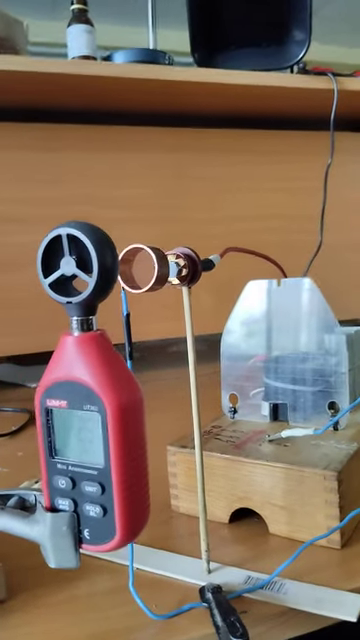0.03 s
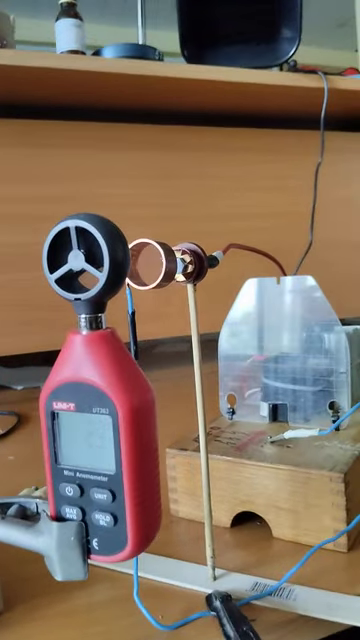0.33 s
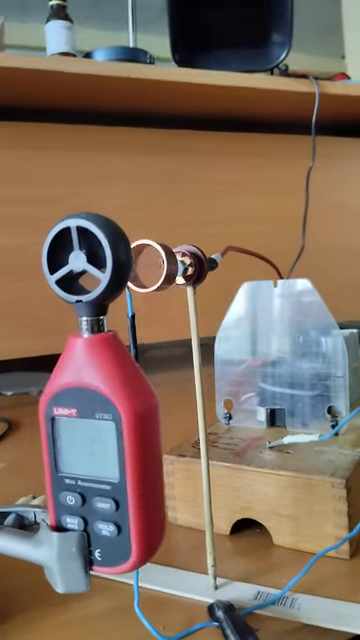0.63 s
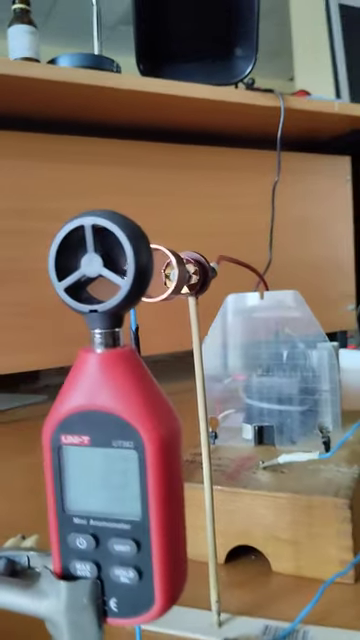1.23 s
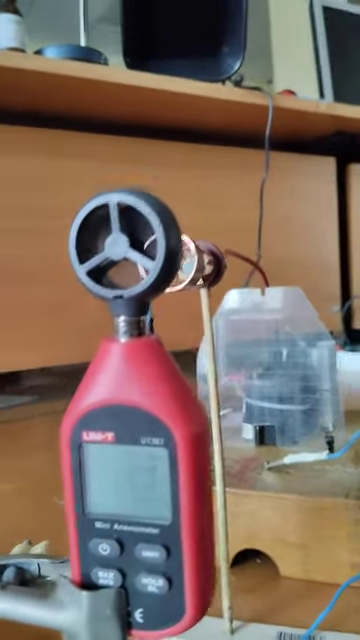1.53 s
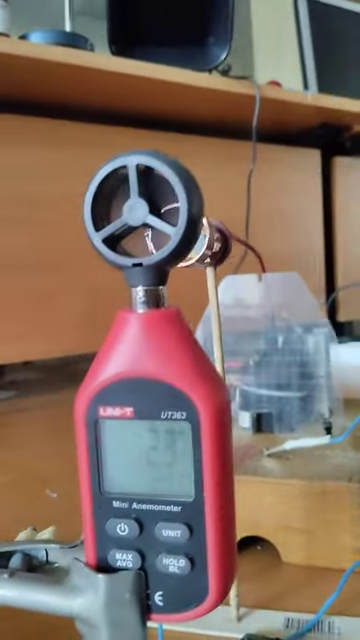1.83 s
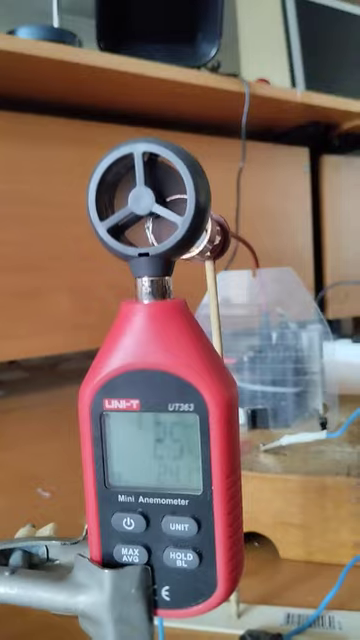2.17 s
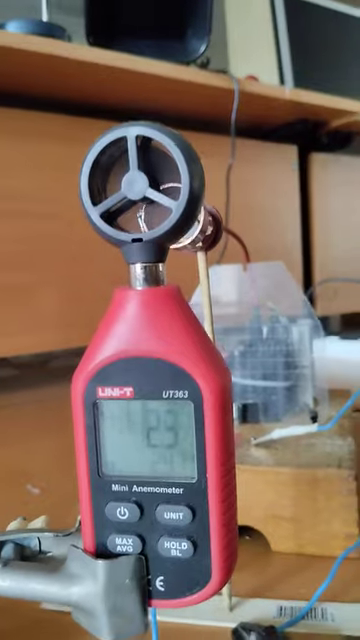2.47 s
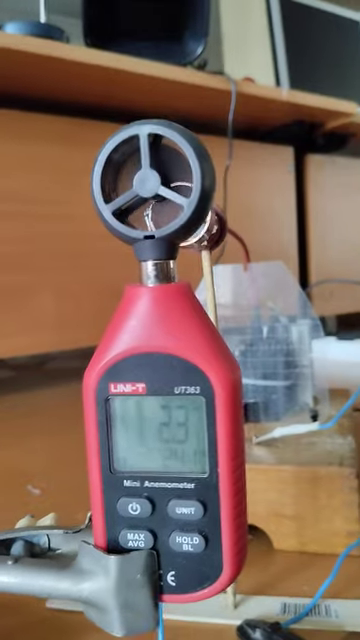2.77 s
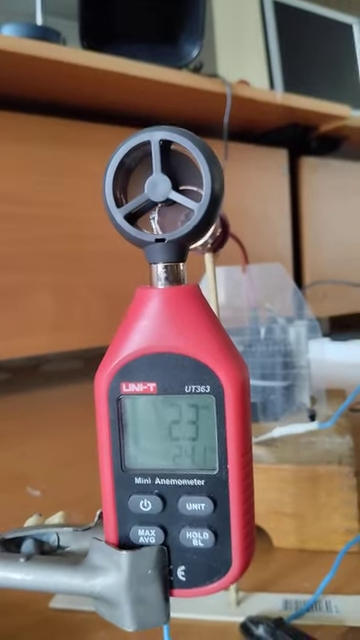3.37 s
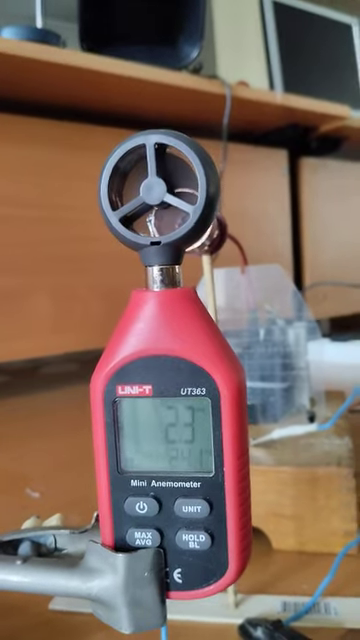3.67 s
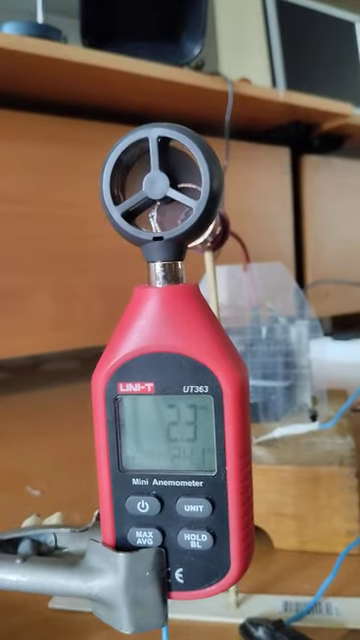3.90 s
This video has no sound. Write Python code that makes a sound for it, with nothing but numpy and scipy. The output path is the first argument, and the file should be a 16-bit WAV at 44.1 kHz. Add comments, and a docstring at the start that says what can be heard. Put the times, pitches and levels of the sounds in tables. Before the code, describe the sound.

A high-voltage discharge hisses steadily from a small device on a desk. The bright hiss shifts slightly in tone as the microphone moves closer. Two faint spark snaps come midway and near the end, over low room rumble.

```python
"""A high-voltage corona hisses steadily between the copper electrodes of a small ion blower on a desk.
Countless tiny discharges merge into noise that rings the electrodes; the microphone moves closer, so the
colour and the desk reflections shift. Two faint snaps, likely stray sparks, over low room rumble and hum."""
import sys
import numpy as np
from scipy import signal
from scipy.fft import rfft, irfft
from scipy.io import wavfile
from scipy.ndimage import uniform_filter1d, map_coordinates

SR = 44100
rng = np.random.default_rng(int(sys.argv[2]) if len(sys.argv) > 2 else 0)


def dump_mix(stems):
    """Bounce the given channels to the path in sys.argv[1] as a 16-bit WAV at rate SR."""
    frames = np.atleast_2d(stems).T  # one column per channel
    limited = np.clip(frames, -1, 1)  # hard clip at full scale
    pcm = np.round(limited * 32767).astype(np.int16)
    wavfile.write(sys.argv[1], SR, pcm)


N = 176400
BINS_HZ = np.arange(N // 2 + 1) * SR / N


# discharge spectrum: f/Hz, relative level/dB
DISCHARGE_SPECTRUM = [(300.0, -44), (1200.0, -32.5), (1750.0, -29.0), (2250.0, -23.0), (2500.0, -31.5),
                      (4300.0, -22), (7000.0, -22), (9700.0, -10.5), (12300.0, -15.0), (12800.0, -13),
                      (13500.0, -17.0), (15800.0, -16.0)]
# resonances of electrodes and surrounding space: f/Hz, width/Hz, level/dB far, midway, close
RESONANCES = [(3011, 244, -6.5, -4.5, -5), (3627, 384, -16.5, -13.5, -11.5),
              (4890, 410, -11.5, -15.0, -12.5), (5607, 210, -12.5, -9.5, -13.5),
              (6290, 370.0, -7.0, -4, -6.5), (6740.0, 310, -4.5, -8, -11.0), (7523, 310, -3.5, -2.5, -1.0),
              (7806, 170.0, -8.5, -4.5, -2.0), (8290, 350, -8, -0.5, -3), (8517, 149, 1, 1.5, -2),
              (8900, 84, -1.5, -4.5, -1), (9186, 390, -4, -1, -1.5), (10010, 320.0, -8, -13, -9.5),
              (11100, 460, -14.5, -35, -10.5)]
# microphone approach: t/s, nearness (0 far, 1 close)
MIC_NEARNESS = [(0.0, 0.0084), (0.6, 0.1), (1.1, 0.36), (1.45, 0.55), (2.0, 0.6), (2.5, 0.82), (3.0, 1),
                (3.9, 1.0)]
# hiss envelope: t/s, level/dB
HISS_LEVEL = [(0, -26), (.7, -26), (1.2, -24.5), (1.8, -23.9), (2.4, -24.5), (3.1, -24.5), (3.9, -25)]

def corona(room_t60_s=.15, room_db=-13, waver_db=.34):
    """Merged discharges ring the electrodes; colour and reflections follow the microphone."""
    nearness = curve(MIC_NEARNESS)
    discharges = path_notches() * rfft(rng.standard_normal(N))
    discharges *= 1 + undb(room_db) * rfft(tail(room_t60_s))
    modes = np.array(RESONANCES)
    centre_hz, width_hz = modes[:, :1], modes[:, 1:2]
    peaks = 1 / (1 + ((BINS_HZ - centre_hz) / width_hz) ** 2) ** 3
    direct = 0
    for position, peak_db in zip((0, .5, 1), modes[:, 2:].T):
        crossfade = np.maximum(0, 1 - 2 * abs(nearness - position))
        power = colour(DISCHARGE_SPECTRUM) ** 2 + undb(peak_db) ** 2 @ peaks
        direct += crossfade * unit(irfft(discharges * np.sqrt(power), N))
    hiss = unit(add_reflections(direct, nearness))
    return hiss * undb(curve(HISS_LEVEL) + waver_db * drift(rate_hz=16))


# cancellation dips: f/Hz, width/Hz, level/dB
NOTCHES = [(4220, 85, -3.5), (5280, 110, -1.5), (7090, 110, -2.5), (7970, 80, -1.5)]

def path_notches():
    """Gain per bin, with narrow dips where sound paths cancel."""
    return undb(sum(db * np.exp(-((BINS_HZ - hz) / width_hz) ** 2) for hz, width_hz, db in NOTCHES))


# bounce off the moving wind meter: t/s, lag/ms, level/dB
METER_REFLECTION = [(0.0, 0.67, -18), (0.4, 0.68, -16), (0.8, 0.654, -29), (1.1, 0.633, -17.5),
                    (1.5, 0.63, -11.5), (1.8, 0.59, -22), (2.1, 0.56, -21.5), (2.6, 0.54, -26),
                    (3.0, 0.52, -21.5), (3.9, 0.61, -24.5)]
# desk, shelf and meter: lag/ms far, lag/ms close, level/dB
SURFACE_REFLECTIONS = [(1.62, 1.541, -21.5), (2.45, 2.4, -17), (3.2, 3.4, -19), (3.7, 4.15, -19.5),
                       (5.6, 6.0, -16.5), (8.3, 8.8, -19.5)]

def add_reflections(direct, nearness, hand_sway_ms=.0081):
    """Nearby surfaces comb-filter the hiss; lags move with the meter, the approach and hand sway."""
    times, meter_ms, meter_db = np.array(METER_REFLECTION).T
    meter_bounce = moving_delay(direct, curve(np.c_[times, meter_ms]))
    heard = direct - undb(curve(np.c_[times, meter_db])) * meter_bounce
    for far_ms, close_ms, db in SURFACE_REFLECTIONS:
        lag_ms = far_ms + (close_ms - far_ms) * nearness + hand_sway_ms * drift(rate_hz=2.2)
        heard += undb(db) * moving_delay(direct, lag_ms)
    return heard


# snaps: t/s, crack level/dB, crack treble/dB, knock level/dB, echo lag/ms, echo level/dB
SNAPS = [(1.9769, -3.5, 2, -22, 1.4, -2), (3.7115, -5, -7, -13, 3.0, -5)]
# bright crack: f/Hz, relative level/dB
CRACK_SPECTRUM = [(300, -31), (1500, -22), (4500, -14), (6300, 1), (8000, -1), (10500, 2), (12500, -9),
                  (16000, -11)]
# dull knock: f/Hz, relative level/dB
KNOCK_SPECTRUM = [(100, -14), (230, -2), (390, -10.5), (650, -5.5), (1150, -0.5), (1550, 0), (1800, -8),
                  (2400, 2), (4000, -6), (9000, -21.5)]

def sparks(restrike_ms=.235, restrike_db=-5, knock_t60_s=.035, knock_tail_db=-4):
    """Each spark cracks and restrikes at once, with one close echo and a short, dull knock."""
    snaps = np.zeros(N)
    for start_s, crack_db, treble_db, knock_db, echo_ms, echo_db in SNAPS:
        treble_shelf = colour([(8500, 0), (11000, treble_db)])
        crack = delay(click(CRACK_SPECTRUM), start_s)
        crack = irfft(rfft(crack) * treble_shelf, N)
        crack += undb(restrike_db) * delay(crack, restrike_ms / 1000)
        crack += undb(echo_db) * delay(crack, echo_ms / 1000)
        knock = delay(click(KNOCK_SPECTRUM), start_s)
        knock += undb(knock_tail_db) * signal.fftconvolve(knock, tail(knock_t60_s))[:N]
        snaps += undb(crack_db) * crack + undb(knock_db) * knock
    return snaps


# room rumble: f/Hz, relative level/dB
RUMBLE_SPECTRUM = [(15, -5.5), (33, 0.5), (46, 0), (62, 1), (90, -4), (130, -10), (200, -17.5),
                   (265, -15.5), (330, -20.5), (600, -19.5), (1200, -23.5), (4000, -41.5)]
# hum envelope: t/s, level/dB
HUM_LEVEL = [(0, -64), (1.1, -68), (1.6, -58.5), (2.0, -56.5), (2.4, -69), (3.9, -68)]

def room(rumble_db=-55, hum_hz=67.7):
    """Low rumble and a faint, wavering hum that swells for a moment."""
    rumble = unit(irfft(rfft(rng.standard_normal(N)) * colour(RUMBLE_SPECTRUM), N))
    pitch_hz = hum_hz * (1 + .01 * drift(rate_hz=8.7))
    hum = unit(np.sin(2 * np.pi * np.cumsum(pitch_hz) / SR))
    return undb(rumble_db) * rumble + undb(curve(HUM_LEVEL)) * hum


def undb(db):
    """Decibels to gain."""
    return 10 ** (np.asarray(db) / 20)


def unit(x):
    """Scale to rms 1."""
    return x / np.sqrt(np.mean(x ** 2))


def curve(rows):
    """Join (t/s, value) rows by straight lines."""
    return np.interp(np.arange(N) / SR, *np.array(rows).T)


def colour(spectrum):
    """Gain per bin from (f/Hz, level/dB) rows."""
    hz, db = np.array(spectrum).T
    return undb(np.interp(np.log(BINS_HZ + 1), np.log(hz), db))


def click(spectrum):
    """Minimum-phase impulse of unit energy."""
    cepstrum = irfft(np.log(colour(spectrum)), N)
    pulse = irfft(np.exp(rfft(2 * cepstrum[:N // 2], N)), N)
    return pulse / np.linalg.norm(pulse)


def drift(rate_hz):
    """Smoothed random steps, rms 1."""
    hold = int(SR / rate_hz)
    steps = np.repeat(rng.standard_normal(N // hold + 1), hold)
    return unit(uniform_filter1d(uniform_filter1d(steps, hold), hold)[:N])


def tail(t60_s):
    """Decaying noise of unit energy."""
    scatter = rng.standard_normal(N) * np.exp(-np.log(1000) * np.arange(N) / SR / t60_s)
    return scatter / np.linalg.norm(scatter)


def delay(x, lag_s):
    """Delay by whole samples."""
    return np.concatenate([np.zeros(int(lag_s * SR)), x])[:N]


def moving_delay(x, lag_ms):
    """Time-varying fractional delay."""
    return map_coordinates(x, [np.arange(N) - lag_ms * SR / 1000], order=3, mode="mirror")


def scene():
    """Corona, sparks and room, all centred."""
    mono = corona() + sparks() + room()
    return np.array([mono, mono])


def record(dry, stop_s=3.897, cutoff_hz=15750):
    """Abrupt stop and steep low-pass."""
    gate = curve([(stop_s - .002, 1), (stop_s + .004, 0)])
    lowpass = signal.ellip(12, .1, 80, cutoff_hz, fs=SR, output="sos")
    return signal.sosfilt(lowpass, dry * gate)


dry = scene()
out = record(dry)
dump_mix(out)
```